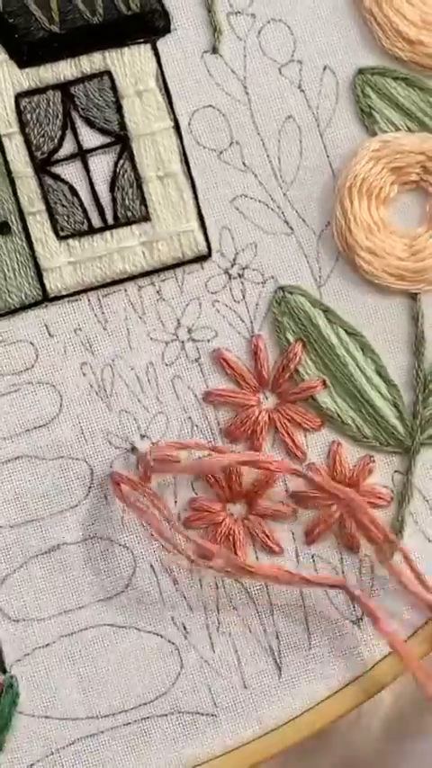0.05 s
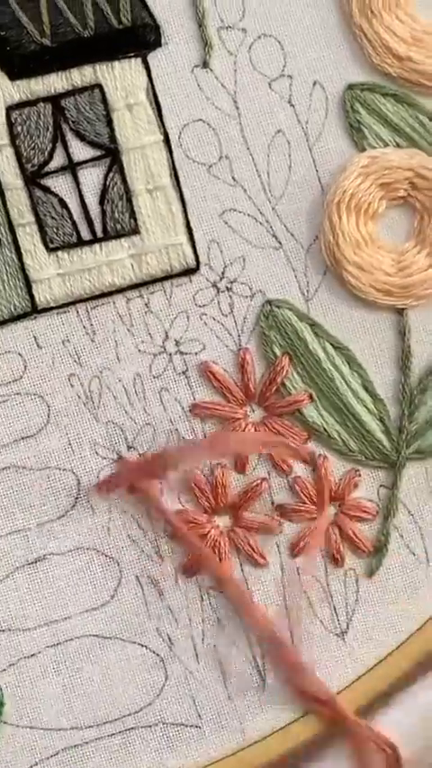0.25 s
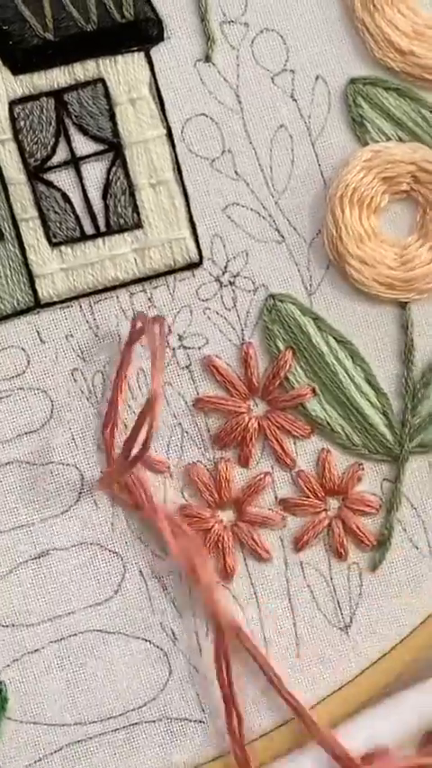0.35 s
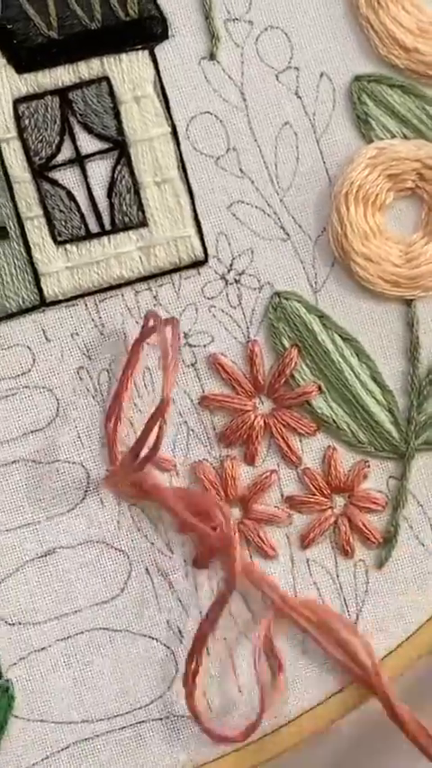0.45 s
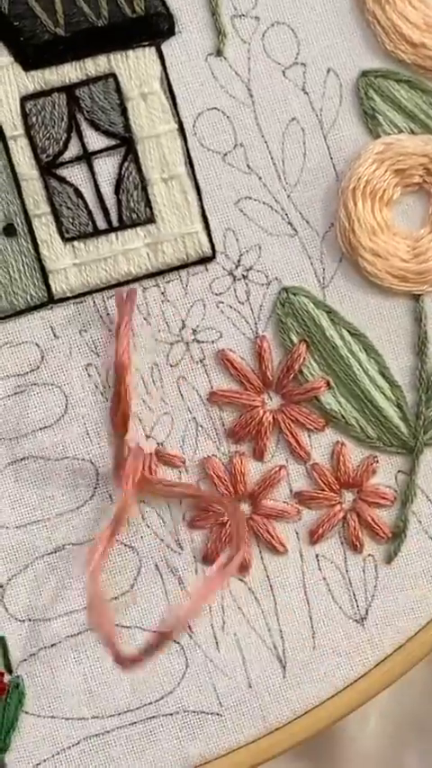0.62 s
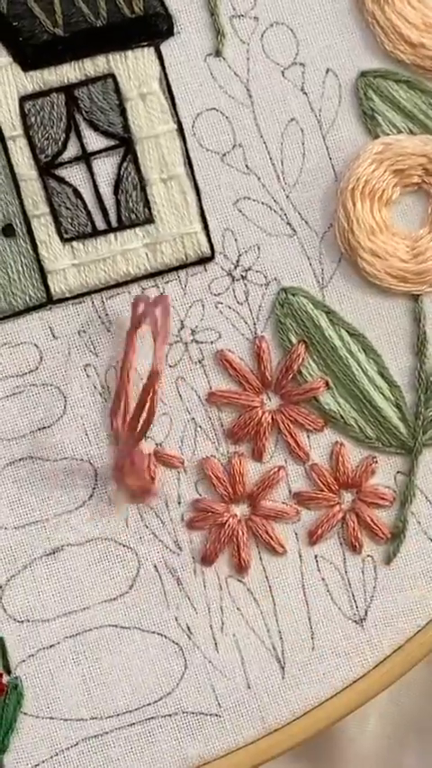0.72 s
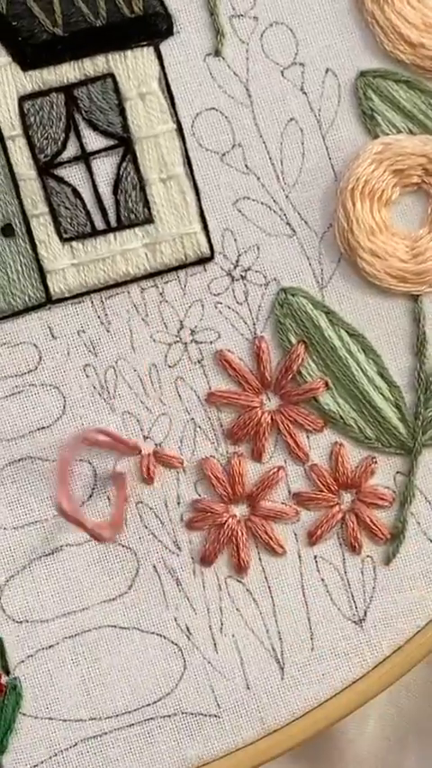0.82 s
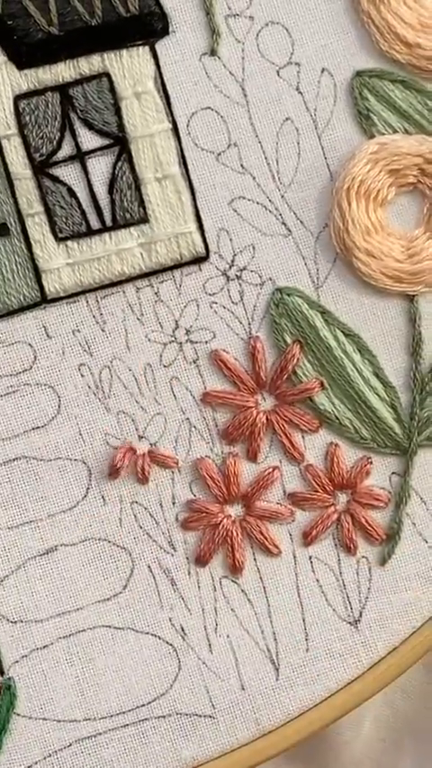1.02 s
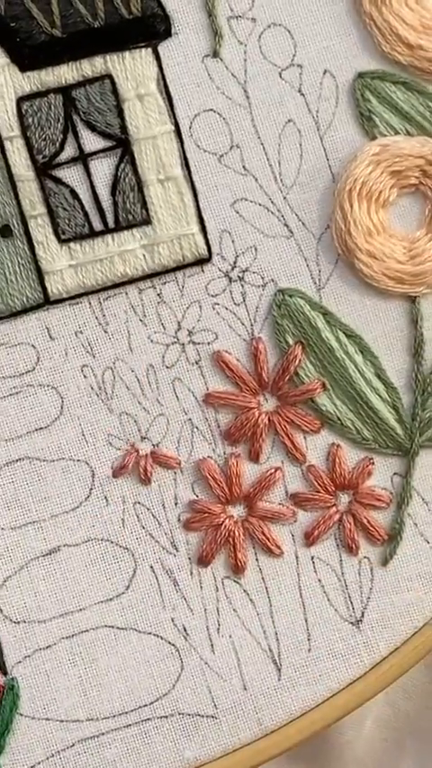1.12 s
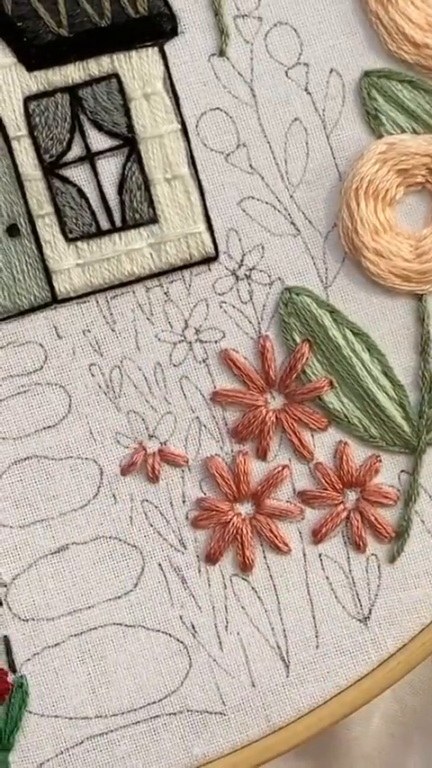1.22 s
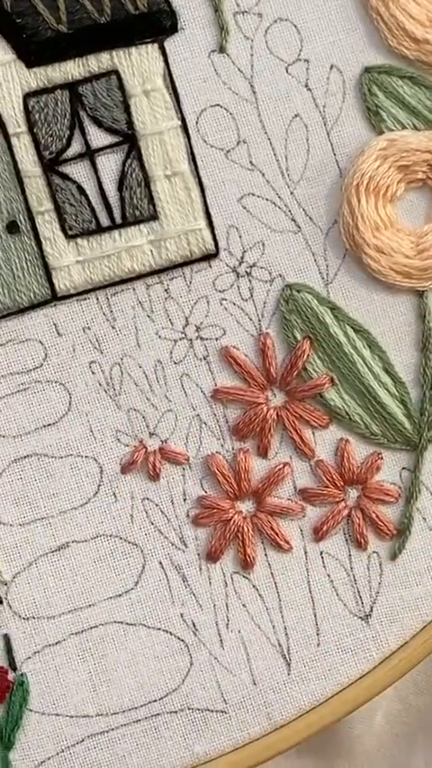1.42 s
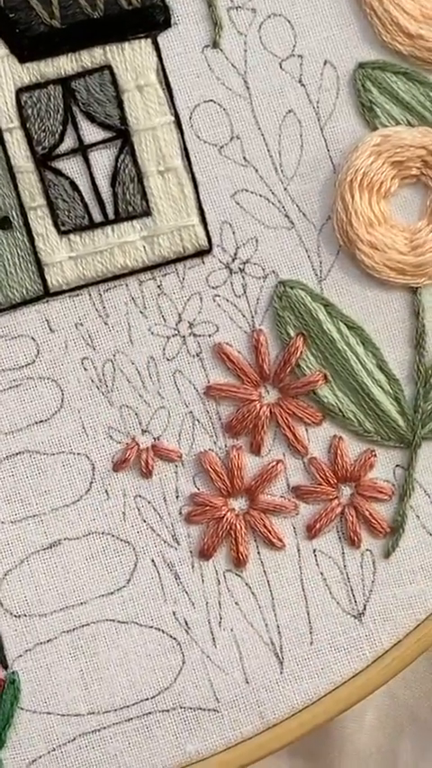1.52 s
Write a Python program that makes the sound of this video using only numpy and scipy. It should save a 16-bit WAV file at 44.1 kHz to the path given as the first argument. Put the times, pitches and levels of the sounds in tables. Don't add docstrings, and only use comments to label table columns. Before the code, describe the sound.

A needle pops through stretched fabric in a hoop, heard very close in a quiet room. Faint touches come first, then at 0.22 seconds a loud, sharp tap with a quick falling pitch and short hollow drum ring. Thick thread immediately drags through, a bumpy low rasp with fibre hiss, strongest until about 0.55, weakening by 1.0. Soft hoop thumps and tiny taps follow near 0.85-1.1 and 1.35.

```python
import sys
import numpy as np
from scipy import signal
from scipy.fft import rfft, irfft
from scipy.io import wavfile
from scipy.ndimage import uniform_filter1d

SR = 44100
rng = np.random.default_rng(int(sys.argv[2]) if len(sys.argv) > 2 else 0)


def wav_record(signal):
    frames = np.transpose(np.atleast_2d(signal))
    bounded = np.clip(frames, -1, 1)
    quanta = np.round(bounded * 32767).astype(np.int16)
    wavfile.write(sys.argv[1], SR, quanta)


def undo_db(level):
    steps = np.asarray(level, float) / 20
    return 10 ** steps


N = 68355

# [start_s, level_db, slowness_ratio, tick_db, ring_db]
EYE_POP = (.21927, -2.2, 1.0, -13, 0)
# [start_s, level_db, slowness_ratio, tick_db, ring_db]
TOUCHES = [(0.0668, -44.5, 1.25, -48, 13.5), (.1830, -37, 0.65, -1.5, 0), (0.1986, -44, 0.86, -45, 0),
           (0.203, -29.5, 1.63, -39, 3), (0.8446, -38, 0.95, -35, 8), (0.919, -36.5, 1.92, -40, 12),
           (0.978, -66, 1.72, -9.5, -23.5), (1.086, -53.5, 0.79, -40, 2.5), (1.098, -50.5, 0.55, -39.5, -3),
           (1.3346, -41, 0.91, -15.5, 8), (1.373, -50.5, 2.04, -27, 4.5)]
# [pitch_hz, width_hz, level_db]
POP_TICK = [(1239.3, 160, 8.5), (1700, 700, 1), (2256, 810, -3), (4100, 1200, -10), (4630, 830, -20),
            (6340, 1200, -24), (8500, 1300, -28.5), (13600, 1800, -31.5)]
# [pitch_hz, width_hz, level_db]
TOUCH_TICK = [(2986, 900, -3), (5180, 1200, -3), (7000, 2000, -7), (9500, 1800, -11.5)]
# [pitch_hz, level_db, t60_s]
DRUM_MODES = [(60.5, -2.5, 0.4), (96, 4.5, 0.2), (151, -1, 0.13), (196.4, -7, .2), (258, -3.5, 0.11),
              (292, -0.5, 0.12), (348.6, -8, 0.26), (408, -11.5, 0.075), (425.8, -11, 0.2),
              (514, -6.5, 0.057), (549.4, -3, 0.13), (603, -25, .15), (685.5, -11.5, .1), (774, -7, 0.078)]
# [time_s, tension_db, speed_db]
PUSH_BEFORE = [(0.03, -78, -77), (0.076, -54.5, -63), (0.152, -66.5, -74.5), (0.164, -72, -82),
               (0.178, -51, -68.5)]
# [time_s, tension_db, speed_db]
PULL_AFTER = [(0.24, -25.5, -57), (0.272, -31.5, -54.5), (0.352, -34.5, -61), (0.368, -37.5, -58.5),
              (0.45, -35.5, -58.5), (0.504, -39, -55.5), (0.522, -34.5, -61), (0.832, -49, -63),
              (0.926, -42.5, -59), (0.958, -54, -80.5), (0.978, -49, -66), (1.01, -59, -84.5),
              (1.2, -75, -98)]
# [pitch_hz, width_hz, level_db]
WEAVE_BANDS = [(560, 890, 6.5), (854, 125, -5), (1150, 120, -15), (2200, 1000, -26)]
# [pitch_hz, density_db]
FIBRE_HISS = [(2600, -17), (3300, -7.5), (5600, -6.5), (7000, -8), (10400, -11.5), (12800, -13),
              (14600, -9), (15800, -17)]
# [pitch_hz, width_hz, level_db, loudest_s]
FIBRE_SWINGS = [(4570, 1100, -14, 0.2), (6860, 2100, 0, 0.69), (8320, 1300, 2.5, .35),
                (9610, 2700, 1.5, .45), (11470, 900, -0.5, .3), (14700, 1300, -6.5, .55)]
# [pitch_hz, width_hz, level_db]
HOLE_EDGE = [(1820, 450, -1), (2480, 450, -1.5)]
# [time_s, sway_db, upper_mode_over_lower_db]
HOOP_ROCKING = [
    [(0.05, -67, 6), (0.078, -52, 13), (0.106, -45, 3.5), (0.134, -54, -24), (0.155, -64, 0)],
    [(0.3, -52, -15), (0.36, -37.5, 4), (0.474, -45, -10), (0.534, -48, 9), (0.702, -52, -7),
     (0.758, -62, 5), (0.8, -48.5, 3), (1.168, -70, 0.5), (1.2, -83, -17)],
    [(1.36, -60, 9.5), (1.384, -56.5, 0), (1.418, -60, -6), (1.436, -68, -4), (1.46, -75.5, -2.5),
     (1.486, -66, -1), (1.5, -72, -14)],
]
HOOP_MODES_HZ = 54.2, 101.1
# [pitch_hz, width_hz]
CLOTH_DIPS = [(1420, 690), (3100, 510)]
# [pitch_hz, density_db]
ROOM_AIR = [(40, 1.5), (60, 0), (300, -6.5), (480, -13.5), (1500, -20.5), (6000, -28), (10500, -37),
            (15800, -41.5)]
# [pitch_hz, width_hz, level_db]
ROOM_FIZZ = [(13500, 1500, 6.5), (8400, 410, -18)]


def needle():
    out = np.zeros(N + SR)
    blows = [(*EYE_POP, POP_TICK)] + [(*touch, TOUCH_TICK) for touch in TOUCHES]
    for start_s, *settings in blows:
        at = round(start_s * SR)
        out[at:at + SR // 2] += blow(*settings)
    return out[:N]


def blow(level_db, slowness, tick_db, ring_db, tick_colour):
    chirp_hz, spread_s, swell_s, pass_s = 972, .00215, .0011, .0055
    t = np.arange(SR // 2) / SR / slowness
    chirp = np.sin(2 * np.pi * chirp_hz * spread_s * np.log1p(t / spread_s))
    envelope = np.tanh(t / swell_s) * np.exp(-(t / pass_s) ** 3)
    scrape = .08 * rng.standard_normal(len(t)) * np.exp(-t / .0008)
    tick = sharp_bands((t == 0) + scrape, tick_colour)
    tick = undo_db(tick_db) * tick / abs(tick).max()
    tail = undo_db(ring_db - 16) * ring(DRUM_MODES, .005 * slowness)
    return undo_db(level_db) * (chirp * envelope + tick + tail)


def ring(modes, rise_s):
    lag_s = .0012
    t = np.arange(SR // 2) / SR
    tones = sum(undo_db(db - 60 * t / t60) * np.cos(2 * np.pi * hz * (t - lag_s)) for hz, db, t60 in modes)
    return tones * (1 - np.exp(-(t / rise_s) ** 2))


def thread():
    tension, speed = hand(PUSH_BEFORE, PUSH_BEFORE[0][0]) + hand(PULL_AFTER, .22)
    snags = evened(clicks(2500, 1.5) * undo_db(1.2 * drift(45)))
    drum = snagged_drum(snags * tension)
    weave = crowded(sharp_bands(np.roll(snags, SR // 3), WEAVE_BANDS))
    fine = crowded(clicks(7000, 2.0))
    hole = evened(sharp_bands(fine, HOLE_EDGE))
    rub = fibres(fine) + undo_db(-5.5) * hole
    return undo_db(1) * drum + undo_db(-8.5) * tension * weave + speed * rub


def hand(points, start_s):
    time_s, *controls = np.transpose(points)
    t = np.arange(N) / SR
    onset = np.clip((t - start_s) / .003, 0, 1)
    return np.array([undo_db(np.interp(t, time_s, db, right=-90)) * onset for db in controls])


def snagged_drum(push):
    damped = [(hz, db, 0.26 * t60) for hz, db, t60 in DRUM_MODES[2:]]
    response = ring(damped, 0.0024)
    drum = signal.fftconvolve(push, response / np.linalg.norm(response))[:N]
    drum = signal.lfilter(*signal.butter(1, 220, "high", fs=SR), drum)
    return signal.sosfilt(signal.butter(4, 900, fs=SR, output="sos"), drum)


def fibres(fine):
    swing_s, swing_db = .17, 9
    t = np.arange(N) / SR
    hiss = undo_db(5.0) * fine
    for hz, width, db, loudest_s in FIBRE_SWINGS:
        swing = undo_db(swing_db * np.exp(-((t - loudest_s) / swing_s) ** 2))
        hiss = hiss + sharp_bands(fine, [(hz, width, db)]) * swing
    return coloured(FIBRE_HISS, hiss) * undo_db(1.0 * drift(60))


def crowded(x):
    t60_s, tail_db = .07, -8
    t = np.arange(SR // 8) / SR
    tail = rng.standard_normal(len(t)) * undo_db(-60 * t / t60_s)
    dense = signal.fftconvolve(x, tail / np.linalg.norm(tail))[:len(x)]
    return evened(x + undo_db(tail_db) * dense)


def hoop():
    t = np.arange(N) / SR
    low, high = (hoop_mode(hz) for hz in HOOP_MODES_HZ)
    out = np.zeros(N)
    for rocking in HOOP_ROCKING:
        time_s, sway_db, upper_db = np.transpose(rocking)
        level = undo_db(np.interp(t, time_s, sway_db + 0.5, left=-99, right=-99))
        level = uniform_filter1d(level, size=600)
        upper = undo_db(np.interp(t, time_s, np.minimum(upper_db, 12)))
        out += level * (low + upper * high)
    return out


def hoop_mode(hz):
    phase = 2 * np.pi * np.cumsum(hz * (1 + .04 * drift(8))) / SR
    return np.sin(phase) * undo_db(1.5 * drift(15))


def room():
    air = coloured(ROOM_AIR, rng.standard_normal(N)) * undo_db(-63 + 1.2 * drift(13.6))
    crackle = clicks(1400, 2.5) * undo_db(3 * drift(70))
    fizz = bands(bands(crackle, ROOM_FIZZ), ROOM_FIZZ)
    return air + undo_db(-76.5) * evened(fizz)


def evened(x):
    return x / np.sqrt(np.mean(x ** 2) + 1e-20)


def coloured(points, x):
    f, db = np.transpose(points)
    hz = np.fft.rfftfreq(len(x), 1 / SR) + 1
    bass_cut = np.clip(hz / f[0], 0, 1) ** 3
    gain = undo_db(np.interp(np.log(hz), np.log(f), db)) * bass_cut
    return evened(irfft(rfft(x) * gain, len(x)))


def bands(x, table):
    out = 0
    for k, (hz, width, db) in enumerate(table):
        peak = signal.iirpeak(min(hz, .45 * SR), hz / width, SR)
        out = out + (-1) ** k * undo_db(db) * signal.lfilter(*peak, x)
    return out


def sharp_bands(x, table):
    return sum(bands(bands(x, [(hz, width, 0)]), [(hz, width, db)]) for hz, width, db in table)


def drift(rate_hz):
    return evened(signal.lfilter(*signal.butter(2, rate_hz, fs=SR), rng.standard_normal(N)))


def clicks(per_s, spread_db):
    chance, side, size = rng.random((N, 3)).T
    return (chance < per_s / SR) * np.sign(side - .5) * undo_db(-spread_db * np.log(size + .01))


def scene():
    cloth = needle() + thread() + hoop()
    for hz, width in CLOTH_DIPS:
        cloth = cloth - 0.66 * bands(cloth, [(hz, width, 0)])
    return (cloth + room())[None]


def low_pass(x):
    return signal.sosfilt(signal.butter(12, 16440, fs=SR, output="sos"), x)


def record(dry):
    heard = signal.sosfilt(signal.butter(6, 44, "high", fs=SR, output="sos"), dry)
    top_cut = signal.firwin(401, 15850, window=("kaiser", 9), fs=SR)
    mix = signal.oaconvolve(heard, top_cut[None], "same")
    return low_pass(mix)


dry = scene()
out = record(dry)
wav_record(out)
```